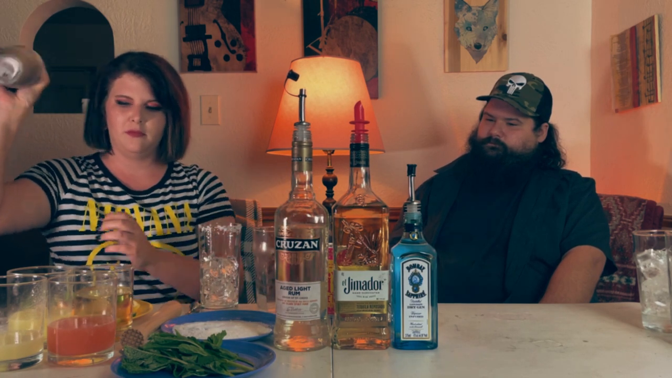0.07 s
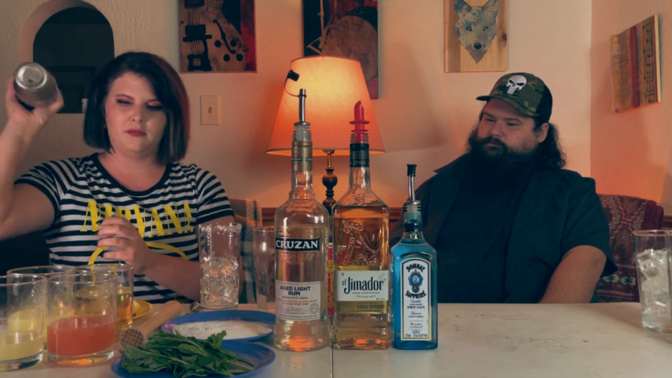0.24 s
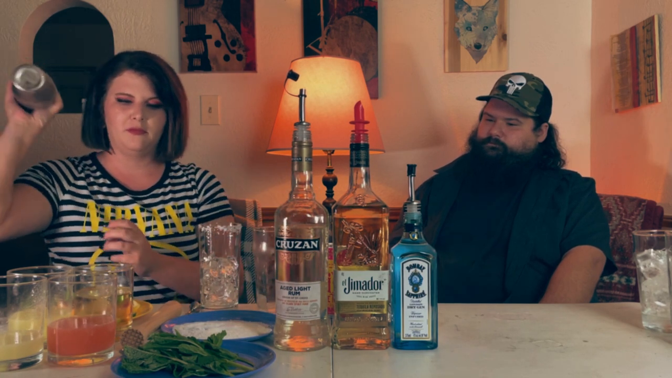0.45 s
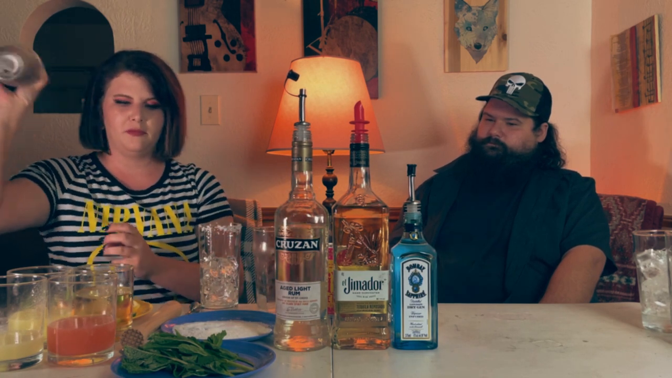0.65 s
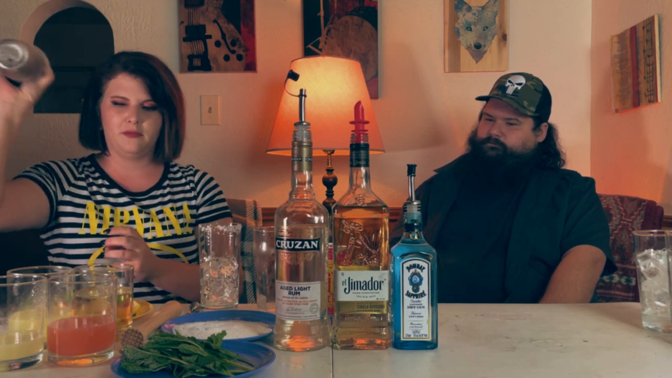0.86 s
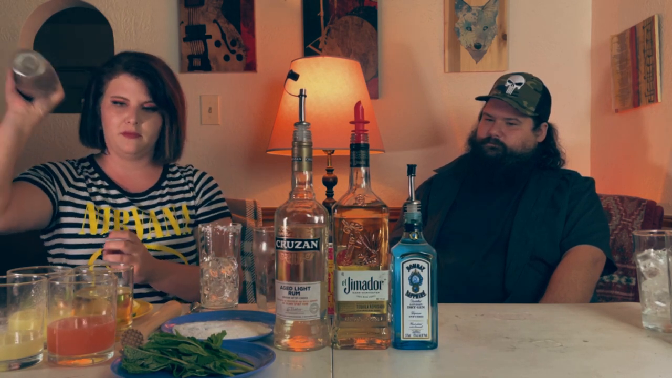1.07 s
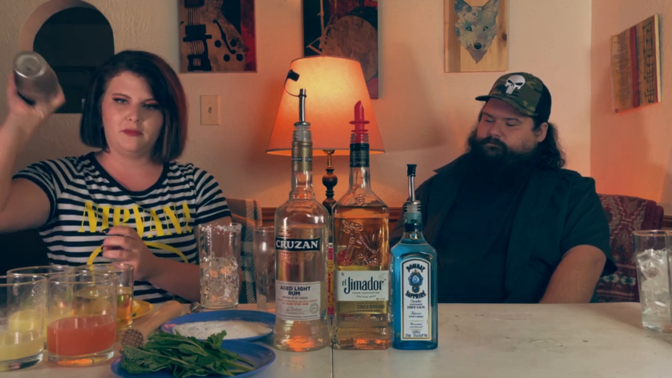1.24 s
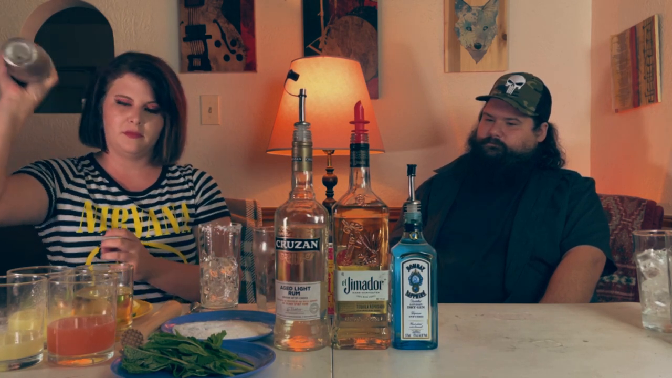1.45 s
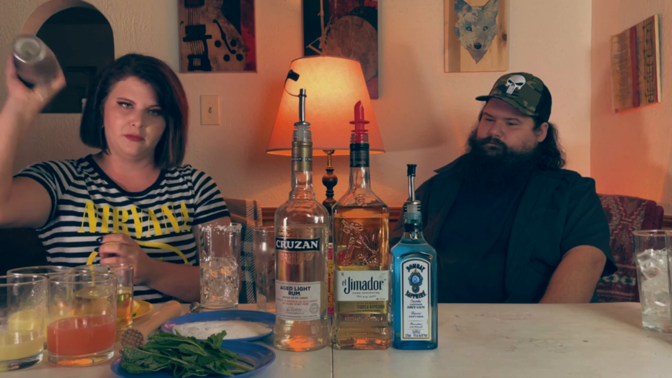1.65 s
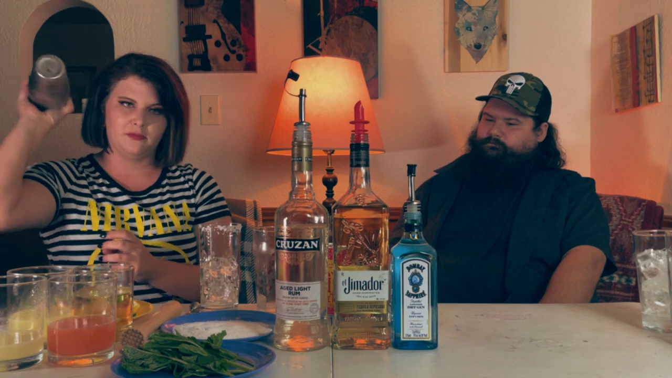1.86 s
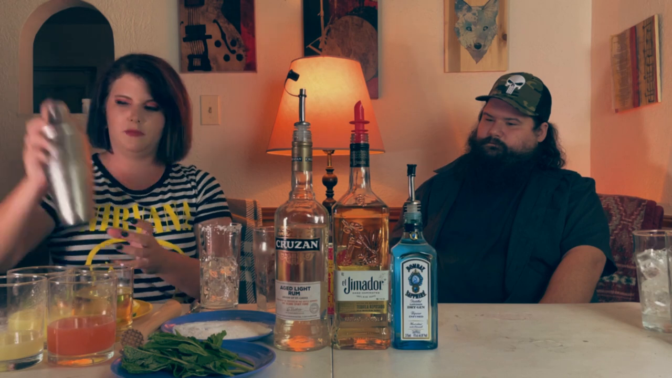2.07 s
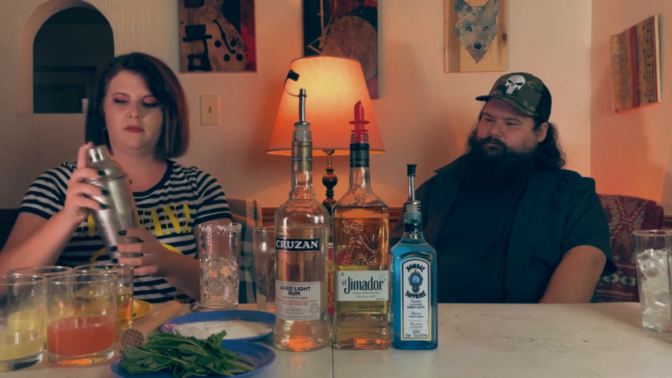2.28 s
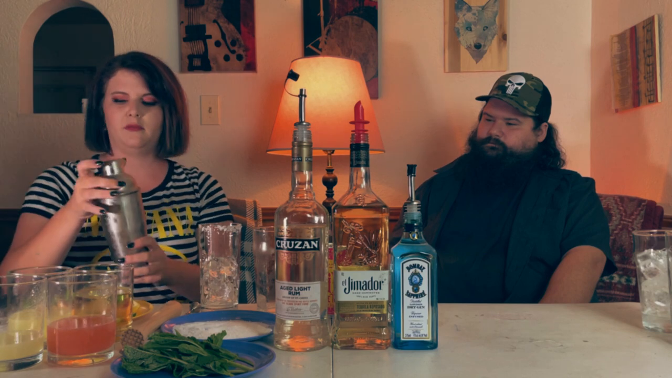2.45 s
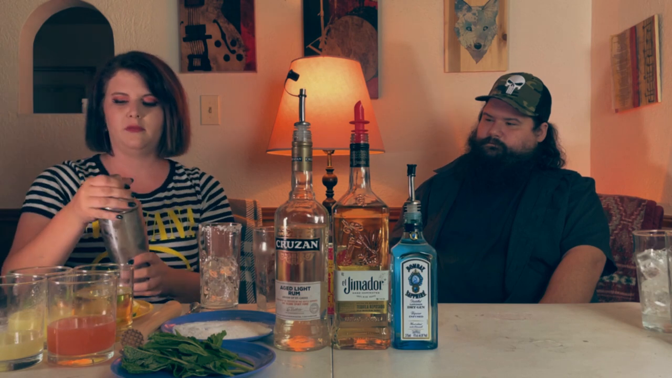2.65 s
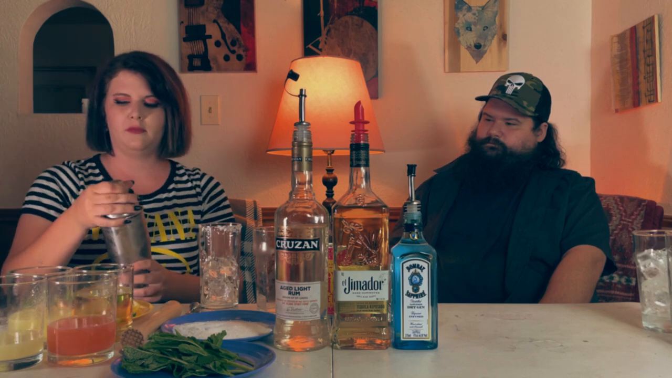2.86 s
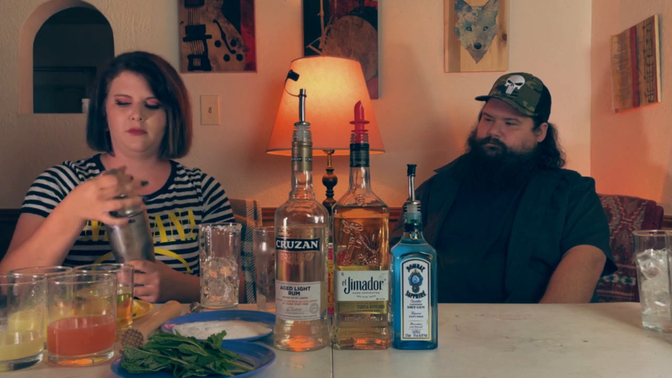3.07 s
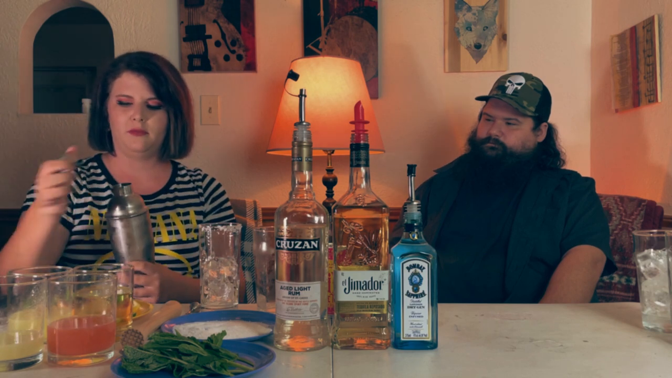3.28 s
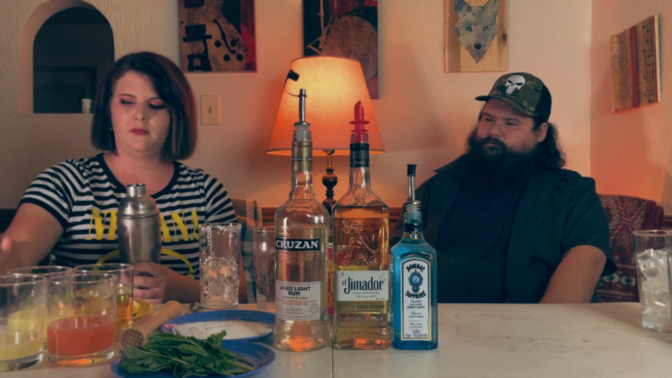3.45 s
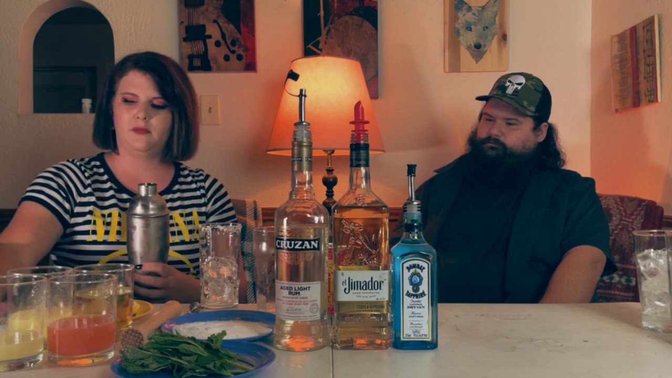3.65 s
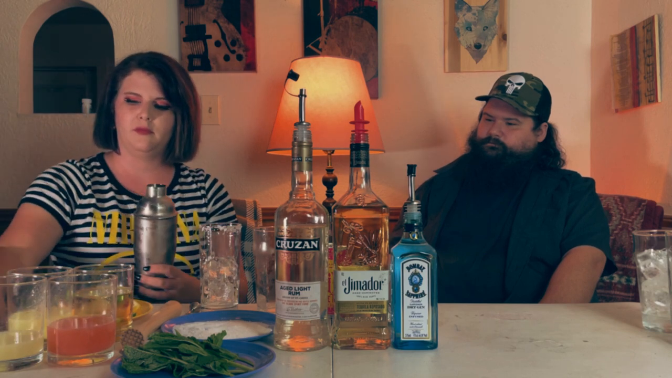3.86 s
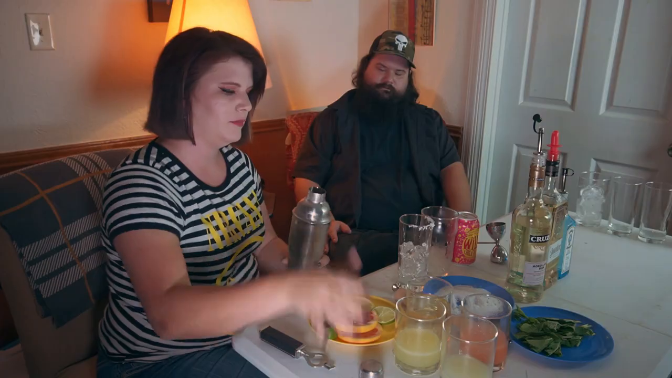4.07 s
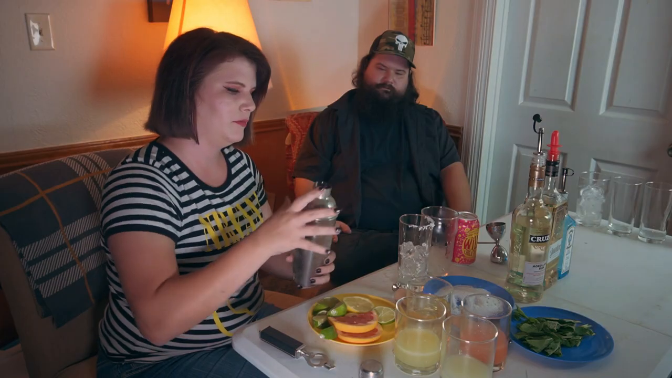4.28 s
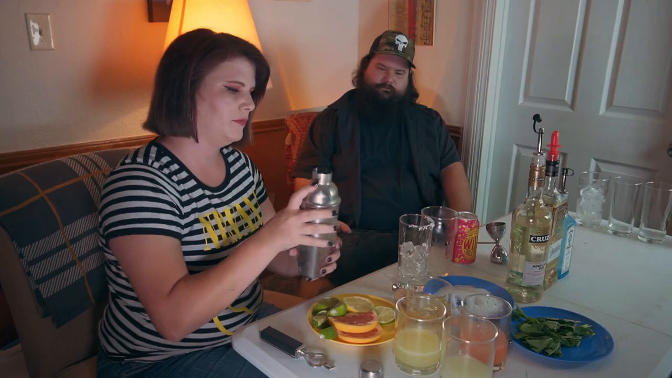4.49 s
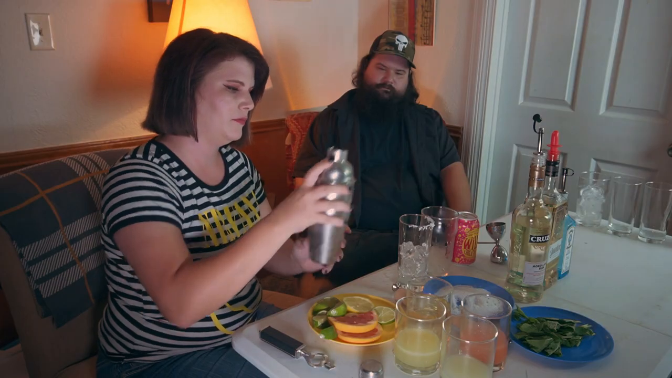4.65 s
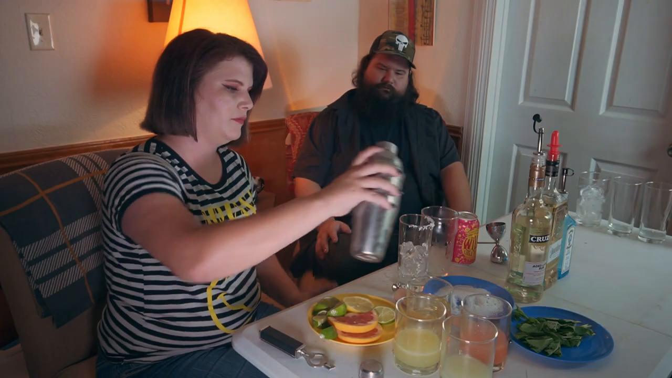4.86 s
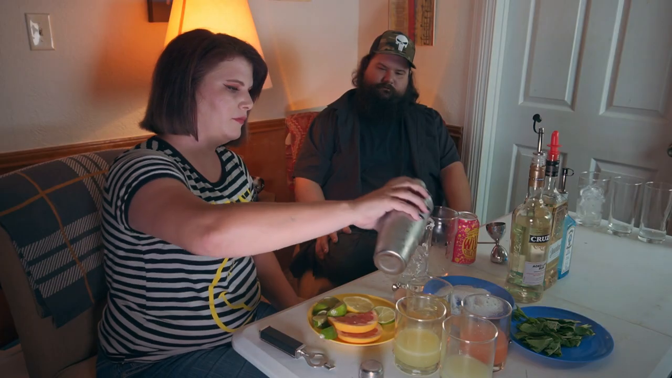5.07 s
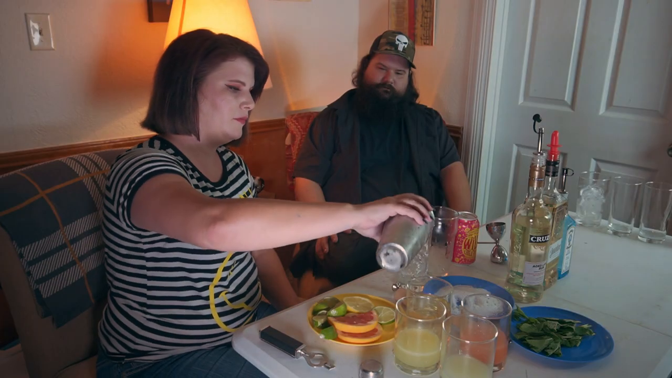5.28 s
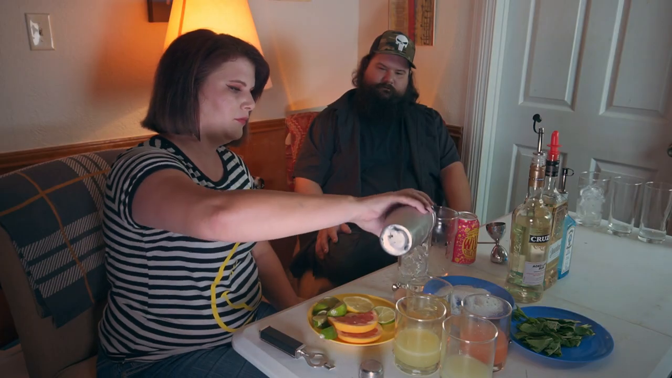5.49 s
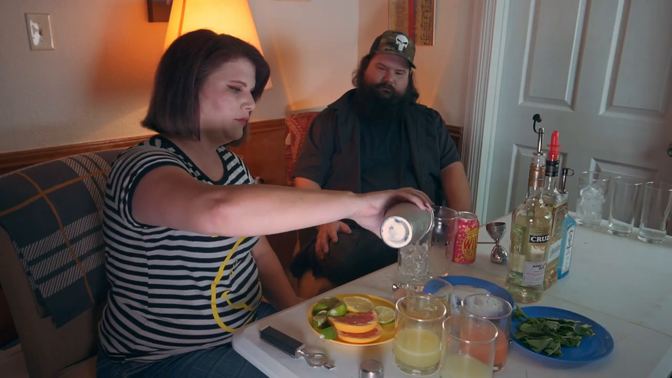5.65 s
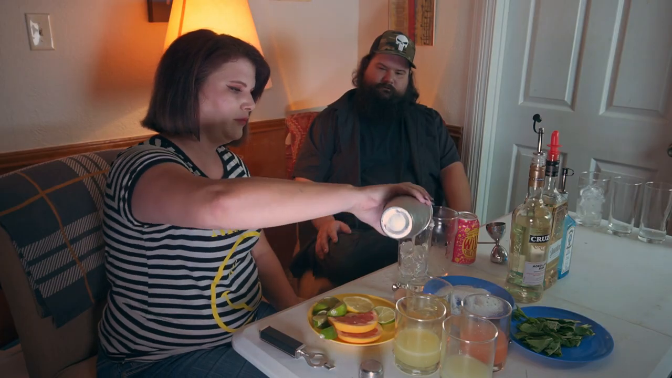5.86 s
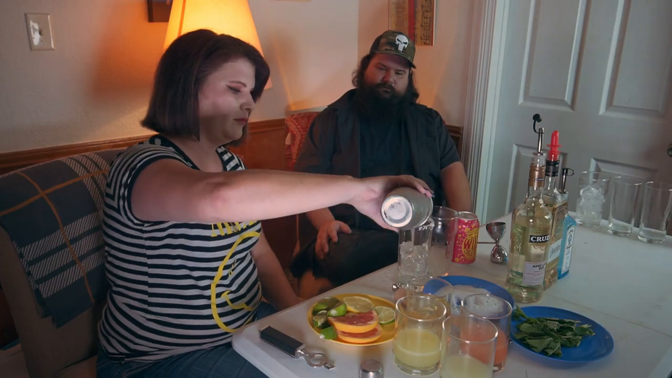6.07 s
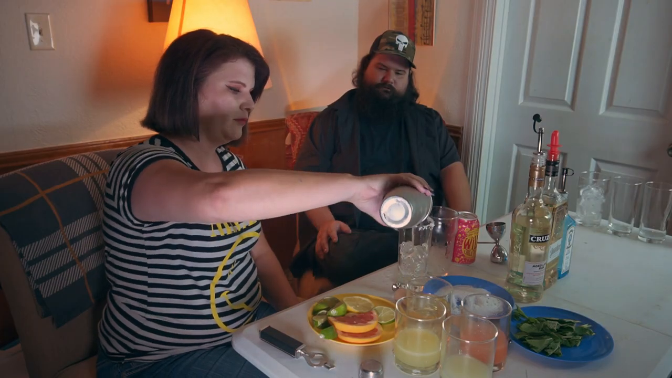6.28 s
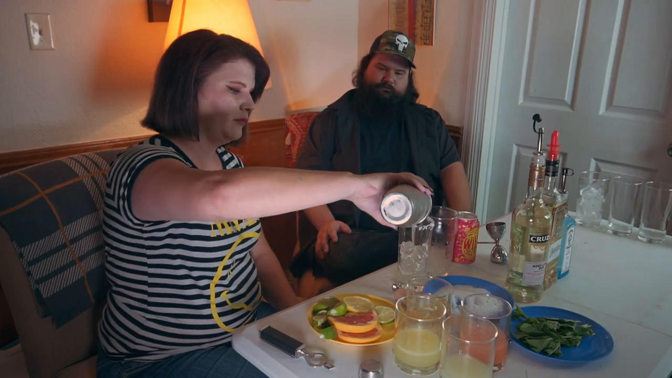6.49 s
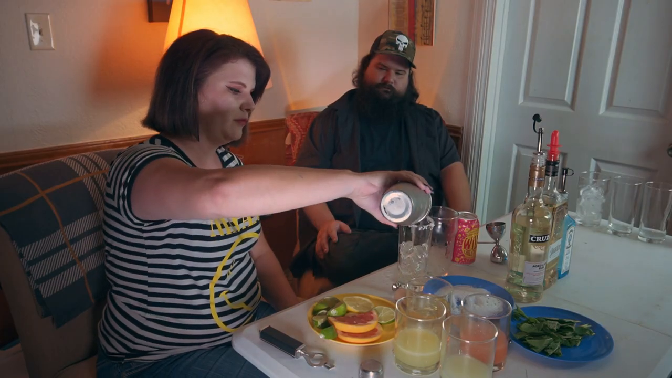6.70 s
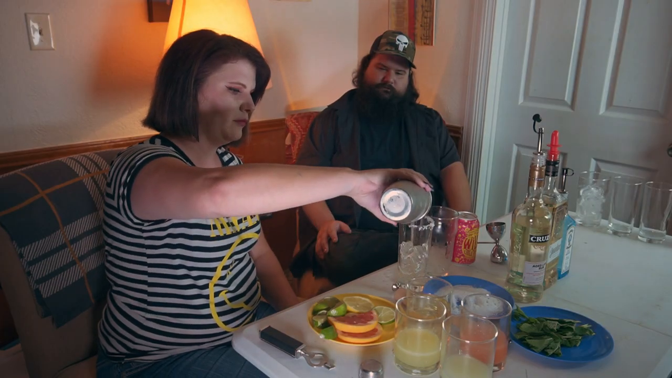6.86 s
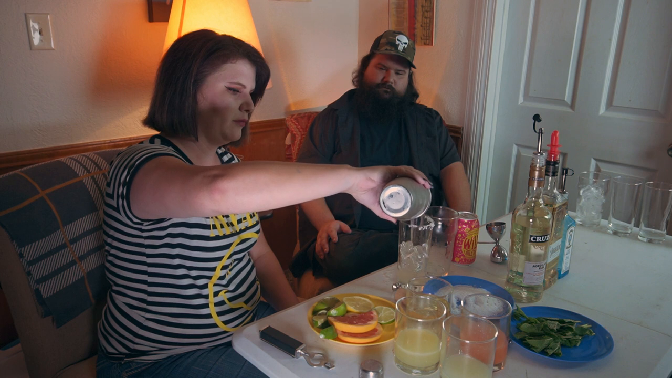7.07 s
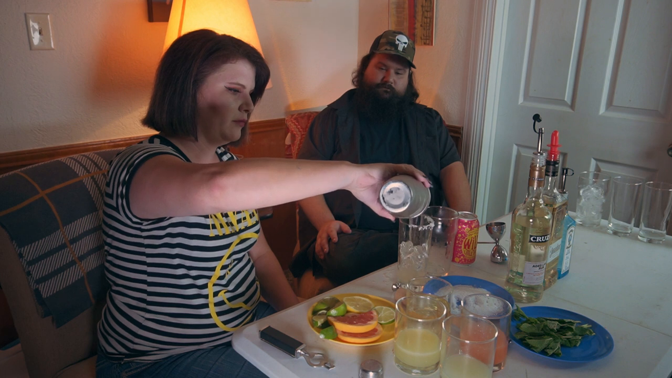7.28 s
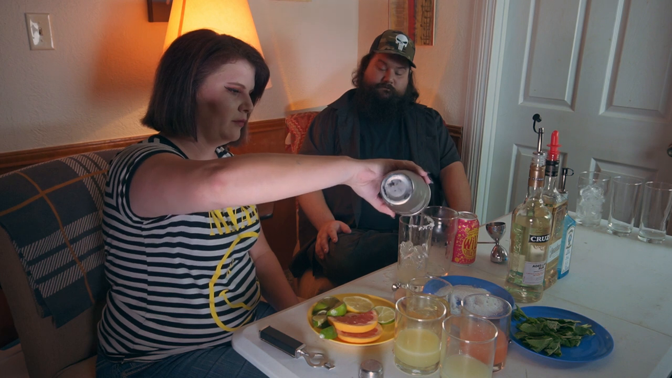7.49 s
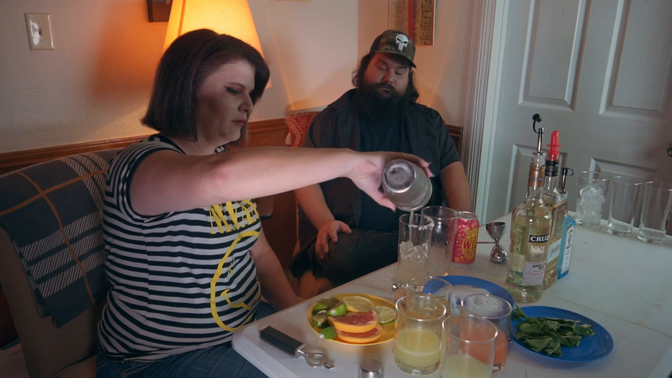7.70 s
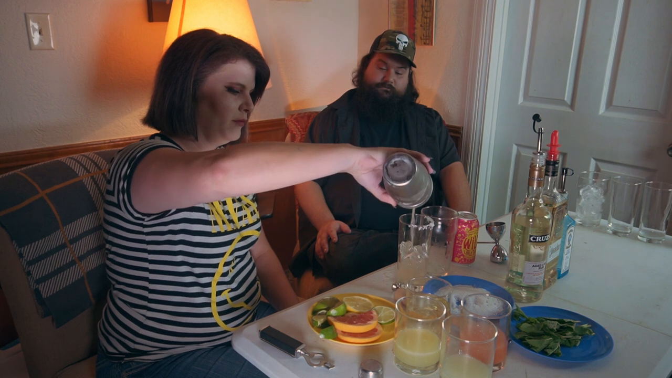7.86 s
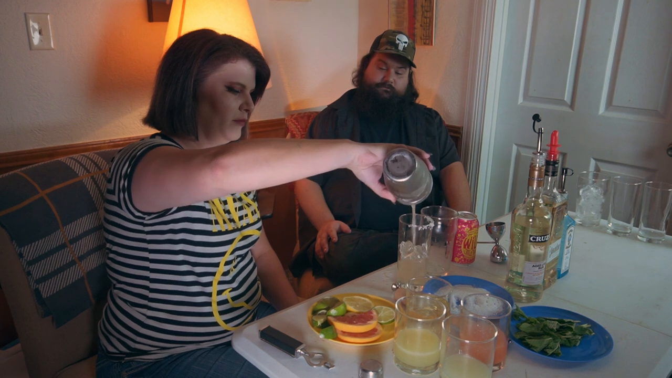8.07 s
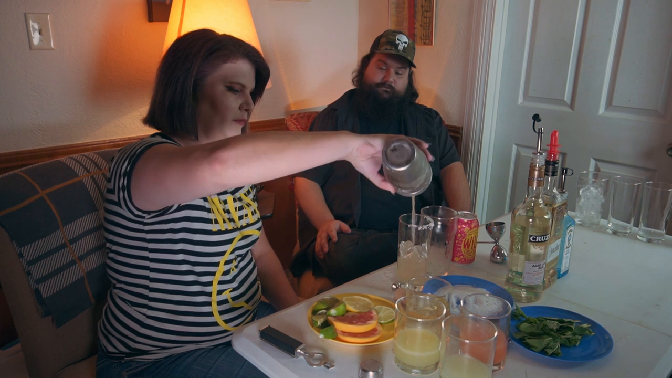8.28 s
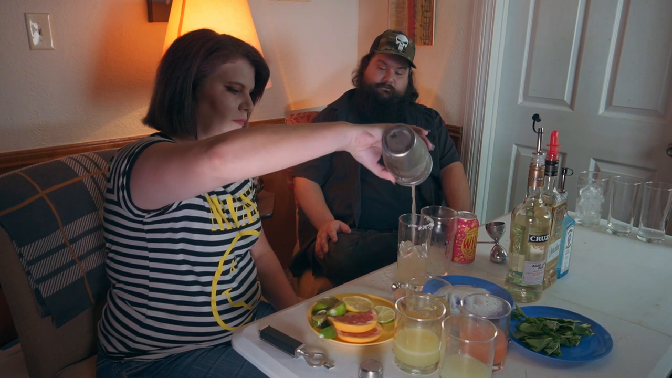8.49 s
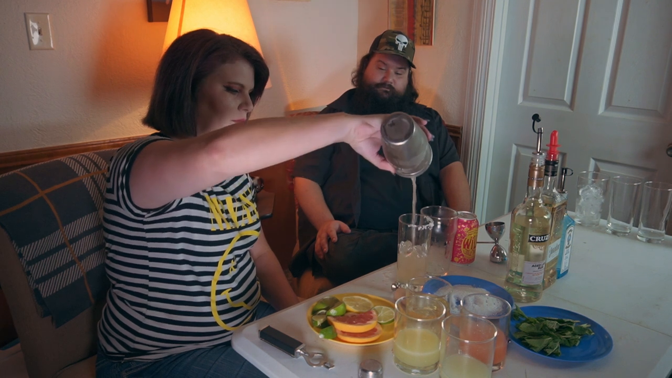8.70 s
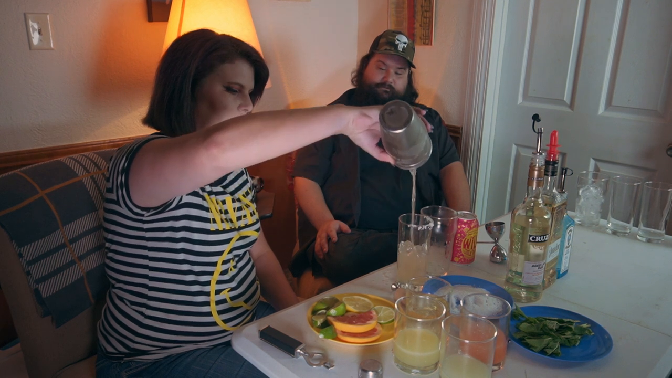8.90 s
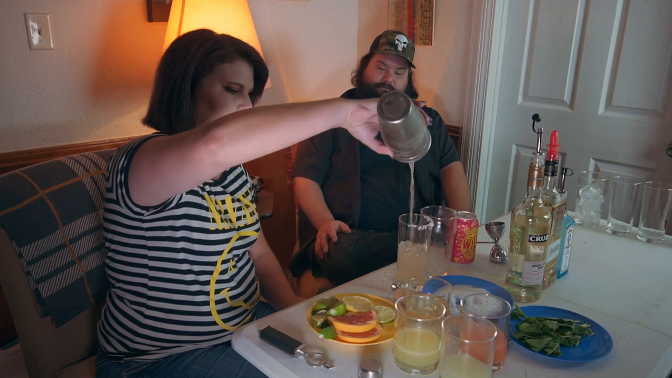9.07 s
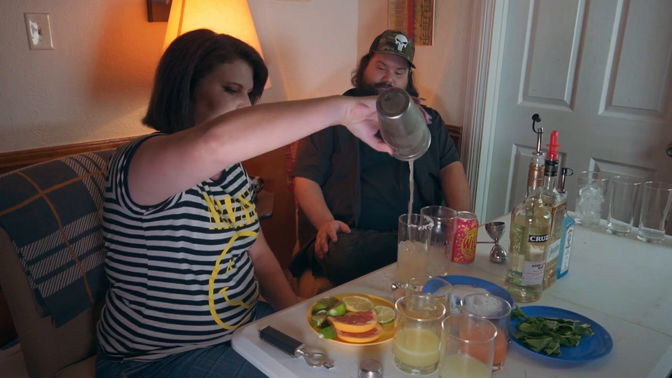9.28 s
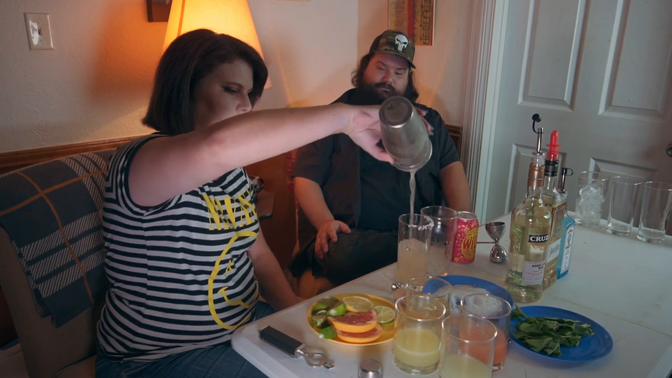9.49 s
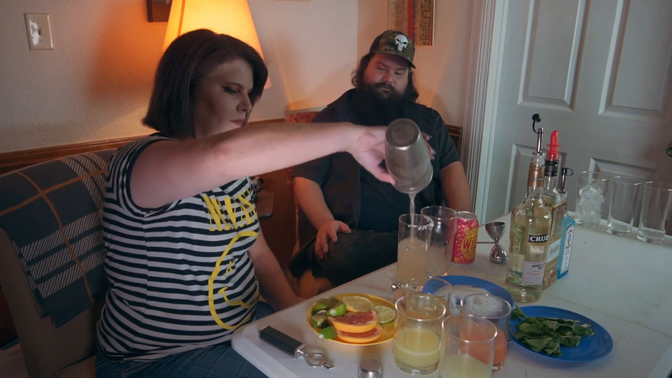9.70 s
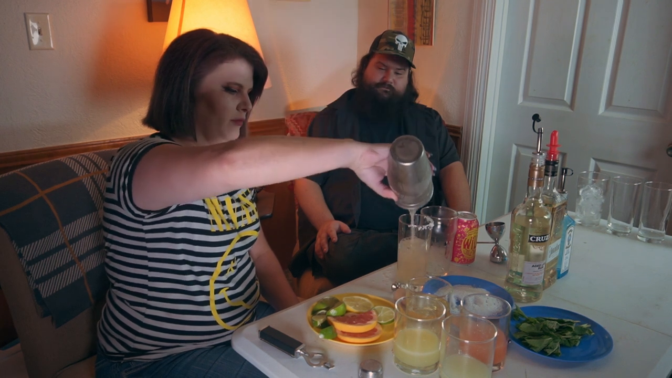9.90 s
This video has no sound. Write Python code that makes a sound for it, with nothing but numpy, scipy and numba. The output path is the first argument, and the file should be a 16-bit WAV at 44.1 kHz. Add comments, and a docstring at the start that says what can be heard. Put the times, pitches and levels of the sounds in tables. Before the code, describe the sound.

Close in a small furnished room, ice cubes slam rapidly back and forth inside a steel shaker, loud enough to overload slightly. The shaking stops after two seconds; hands and cap rub softly on metal, then two quick groups of knocks hit a wooden tabletop. Ice slides and clinks, a thin trickle follows, and finally liquid splashes and gurgles into an iced glass.

```python
"""Ice cubes slam from end to end of a steel cocktail shaker, as noise bursts and pings ringing its shell.
Hands and cap rub the steel, knuckles rap a table twice on its board modes, and loose cubes clink as damped sines.
The shaker is tipped: ice slides, and the drink trickles, then gurgles into a glass of ice as gliding bubbles.
A small furnished room adds echoes and a steady noise floor; a spaced pair of microphones overloads on the
hardest slams."""
import sys
import numpy as np
from scipy import signal
from scipy.fft import rfft, irfft
from scipy.io import wavfile
from scipy.ndimage import uniform_filter1d
from numba import njit

SR = 44100
rng = np.random.default_rng(int(sys.argv[2]) if len(sys.argv) > 2 else 0)


def persist_wave(psi):
    """Save psi, clipped to +-1, as 16-bit WAV."""
    counts = np.round(np.clip(psi, -1, 1) * 32767).astype(np.int16)
    wavfile.write(sys.argv[1], SR, np.atleast_2d(counts).T)


N = 438348
T = np.arange(N) / SR


def undb(db):
    """Level to amplitude: 20 dB is a factor of ten."""
    return 10 ** (np.asarray(db, float) / 20)


def unit(x):
    """Normalization: scale to rms 1."""
    return x / np.sqrt(np.mean(x ** 2))


def high_pass(x, hz):
    """High-pass filter: second-order attenuation below a corner frequency."""
    return signal.sosfilt(signal.butter(2, hz, "high", fs=SR, output="sos"), x)


def ring(x, modes):
    """Modal superposition: two-pole resonances of alternating sign, summed to rms 1."""
    total = 0
    for k, (hz, width, db) in enumerate(modes):
        b, a = signal.iirpeak(hz, hz / width, SR)
        mode = signal.lfilter(b, a, x) * np.sqrt(hz / width)
        total = total + (-1) ** k * undb(db) * mode
    return unit(total)


def level_curve(table):
    """Amplitude envelope: levels joined by straight lines in dB, silent outside the table."""
    s, level_db = np.transpose(table)
    return undb(np.interp(T, s, level_db, -150, -150))


def clicks(rate, spread_db, bed):
    """Shot noise: random tiny impacts of unequal but bounded size over a bed of hiss."""
    hit = rng.random(N) < rate / SR
    size = undb(spread_db * np.minimum(rng.exponential(size=N), 4)) * rng.standard_normal(N)
    return unit(hit * size) + bed * rng.standard_normal(N)


def tails(times, db, t60, rise=0.00012):
    """Exponential decay: each event jumps up and dies away, for half a second at most; powers add."""
    power = np.zeros(N)
    t60, rise = np.broadcast_to(t60, len(times)), np.broadcast_to(rise, len(times))
    for s, gain, decay_s, rise_s in zip(times, undb(db), t60, rise):
        i = int(s * SR)
        t = T[:min(SR // 2, N - i)]
        onset = 1 - np.exp(-t / max(rise_s, 1e-4))
        power[i:i + len(t)] += (gain * 1000 ** (-t / max(decay_s, .01)) * onset) ** 2
    return np.sqrt(power)


def swell(times, db, rise, fall):
    """Exponential growth and decay: up 60 dB over rise s to each moment, down 60 dB over fall s; powers add."""
    late = T - np.reshape(times, (-1, 1))
    slope = np.where(late < 0, -late / max(rise, .01), late / max(fall, .01))
    level_db = np.reshape(db, (-1, 1)) - 60 * slope
    return np.sqrt(np.sum(undb(level_db) ** 2, axis=0))


@njit
def pings(start, hz, t60, size, glide):
    """Damped free vibration: decaying sines whose pitch may glide."""
    out = np.zeros(N)
    for k in range(len(start)):
        z, decay, w = size[k] + 0j, 1000 ** (-1 / (t60[k] * SR)), 2 * np.pi * hz[k] / SR
        for i in range(start[k], min(N, start[k] + int(t60[k] * SR))):
            z *= decay * np.exp(1j * w)
            w *= 1 + glide / (t60[k] * SR)
            out[i] += z.imag
    return out


def cubes(s, db, hz, t60, spread, linger, count):
    """Repeated impact: a cube rings at its own pitch, then bounces at scattered pitches and fading strength."""
    wait = linger * rng.exponential(size=(len(s), count))
    detune = np.exp(spread * rng.standard_normal((len(s), count)))
    wait[:, 0], detune[:, 0] = 0, 1
    size = undb(db[:, None] - 1.0 * (wait > 0) - 8 * wait / linger)
    start = np.minimum((s[:, None] + wait) * SR, N - 1).astype(np.int64)
    f = np.minimum(hz[:, None] * detune, SR / 3)
    return pings(start.ravel(), f.ravel(), np.full(f.size, t60), size.ravel(), -0.024)


def bubbles(rate, hz, spread, cycles, spread_db, glide):
    """Bubble resonance: bubbles or droplets scattered round a pitch, each gliding up as it dies."""
    moment, scatter, strength = rng.random((3, int(rate * N / SR)))
    start = (moment * N).astype(np.int64)
    f = np.broadcast_to(hz, N)[start] * np.exp(spread * (2 * scatter - 1))
    size = undb(-spread_db * np.log(strength + .015))
    return unit(pings(start, f, cycles / f, size, glide))  # each lasts a set number of cycles


# spectrum of the room's noise floor: (frequency [Hz], relative density [dB per Hz])
ROOM_SPECTRUM = [(25, -20), (86, -8), (148, -14.5), (209, -9.5), (253, -12), (410, -21.5), (666, -25.5),
                 (15500, -48.5)]
ROOM_DB = -46.5


def room_tone():
    """Partial coherence: steady shaped noise, low rumble to hiss, mostly unrelated at the two microphones."""
    hz, db = np.transpose(ROOM_SPECTRUM)
    gain = undb(np.interp(np.log(np.fft.rfftfreq(N, 1 / SR) + 1), np.log(hz), db))
    noise = rng.standard_normal((2, N)) + 0.54 * rng.standard_normal(N)  # own part + shared part
    return undb(ROOM_DB) * unit(irfft(rfft(noise) * gain, N))


# cubes hitting steel: (time [s], relative rattle level [dB], ring level [dB], ring pitch [Hz])
SLAMS = [(0.0, -15, -9.5, 2145), (0.04, -3.5, -14, 2265), (0.062, -9, -10.5, 2310), (0.135, -18, -27, 2080),
         (0.224, -6, -12, 2880), (0.315, -4, -14, 2840), (0.348, -5, -8.5, 2370), (0.414, 0, -3.5, 2110),
         (0.453, -2, -2.5, 2106), (0.48, -4, -6.5, 3070), (0.586, -6.5, -18, 2400), (0.605, -5, -6, 2064),
         (0.714, -2.5, 0, 2030), (0.739, 3.5, -0.5, 1970), (0.782, -20.5, -0.5, 2130), (0.86, 5, -15, 2090),
         (0.984, 2.5, 1.5, 1760), (1.044, -6, -10, 2430), (1.139, -2.5, -19.5, 1980),
         (1.166, -5, -7.5, 2060), (1.233, -9, -19, 2380), (1.271, -1.5, -4, 2010), (1.312, -2, -10.5, 2090),
         (1.403, -1.5, -14, 2730), (1.528, -2.5, -5, 1870), (1.694, -1.5, -6, 2040),
         (1.808, 3.5, 2.5, 2062), (1.944, -1.5, -19, 2086), (1.969, -8, -5.5, 2320),
         (2.084, -17, -2.5, 1805), (2.105, 1.5, -9.5, 1890), (2.132, 2, -3, 1850), (2.199, -8.5, -16, 2790),
         (2.296, -17.5, -22, 2800), (2.335, -27, -23, 663), (2.435, -18.5, -34, 2810),
         (2.489, -20.5, -25.5, 2960)]
# heavy cubes landing on the base: (time [s], relative level [dB])
THUMPS = [(0.058, -31.5), (0.318, -26), (0.61, -32), (0.986, -28), (1.165, -18), (1.427, -28.5),
          (1.694, -30)]
# resonances of the steel shell: (frequency [Hz], width [Hz], relative level [dB])
SHELL = [(1114, 610, -4.5), (1606, 1120, 0.5), (1898, 99, -5.5), (2123, 430, -11.5), (2380, 61, -9.5),
         (2696, 620, -6.5), (3950, 2520, -2.5), (4740, 780, -6)]
# bands of the crackle of ice and spray: (frequency [Hz], width [Hz], relative level [dB])
TREBLE = [(8200, 4850, -1), (10560, 5200, 0), (13100, 5500, -8)]
SWING_S, FIRST_SWING_S, BACK_SHARE = .2745, .015, .4  # one full swing; share of it spent going back
BACK_T60_S, FORWARD_T60_S = 0.25, 0.15
BACK_RISE_S, FORWARD_RISE_S = 0.0069, 0.00039  # time constants
SHAKE_ENDS_S, SLUSH_DB, SETTLE_T60_S = 2.22, -25.5, 0.63


def shaker():
    """Forced vibration: slams and slush excite the steel shell, a bright crackle and a dull thud."""
    s, db, ring_db, hz = np.transpose(SLAMS)
    # the back stroke showers loose chips, the forward stroke lands the cubes cleanly
    back = (s - FIRST_SWING_S) / SWING_S % 1 < BACK_SHARE
    t60 = np.where(back, BACK_T60_S, FORWARD_T60_S)
    rise = np.where(back, BACK_RISE_S, FORWARD_RISE_S)
    slush = undb(SLUSH_DB) * 1000 ** (-np.maximum(T - SHAKE_ENDS_S, 0) / SETTLE_T60_S)
    # a long rattle is a shower of chips: brighter than one clean cube
    shower_db = 5.1 * np.log2(t60 / 0.13)
    body = tails(s, db - 12.5, t60, rise) + slush
    crack = tails(s, db - 20 + shower_db, 0.84 * t60, rise) + undb(-8.5) * slush
    thud = tails(*np.transpose(THUMPS), 0.04) * undb(11) + undb(-9.0) * slush
    rattle = clicks(1500, 2.93, 0.74)
    crackle = rattle + 1.05 * clicks(2500, 1.4, 0.26)
    thud_noise = rattle + 0.28 * rng.standard_normal(N)
    out = body * ring(rattle, SHELL) + crack * ring(crackle, TREBLE)
    out += thud * ring(thud_noise, [(320, 207, -4.5), (640, 580, 3.5), (930, 830, 4.0)])
    out += cubes(s, ring_db, hz, 0.039, .06, 0.008, count=3)
    return high_pass(out, 220)  # the shaker's sound carries little below 220 Hz


# extra rings of the held shaker: (frequency [Hz], width [Hz], relative level [dB])
GRIPPED = [(640, 610, -3), (1345, 90, -6.5), (2200, 78, -7), (2910, 160, -8)]
HANDS_S, HANDS_DB, HANDS_RISE_S, HANDS_FALL_S = 2.99, -49, 31, 4.8
# the cap's swell, before it is averaged over CAP_SMOOTH_S
CAP_S, CAP_DB, CAP_RISE_S, CAP_FALL_S, CAP_SMOOTH_S = 3.108, -32.5, .2, .22, .04


def cap():
    """Friction excitation: hands and cap rub the wet steel once the shaking ends."""
    rub = clicks(2000, 3., 0.5)
    hands = swell(HANDS_S, HANDS_DB, HANDS_RISE_S, HANDS_FALL_S)
    pull = uniform_filter1d(swell(CAP_S, CAP_DB, CAP_RISE_S, CAP_FALL_S), int(CAP_SMOOTH_S * SR))
    steel = ring(rub, SHELL + GRIPPED) + undb(-9.0) * ring(rub, TREBLE)
    return (T > SHAKE_ENDS_S) * (hands + pull) * steel


# cubes shifting in shaker and glass: (time [s], relative level [dB], main pitch [Hz])
CLINKS = [(2.687, -38.5, 2540), (2.814, -36.5, 2820), (3.478, -35, 1310), (4.245, -41.5, 3020),
          (4.659, -33, 2230), (4.732, -31, 2320), (4.836, -29.5, 3220), (4.866, -20.5, 1414),
          (5.01, -35, 1320), (5.149, -30.5, 900), (5.239, -24.5, 1816), (5.327, -28, 1225),
          (5.374, -27, 860), (5.431, -21.5, 3260), (5.491, -16, 2940), (5.528, -27, 1860),
          (5.63, -24.5, 910), (5.735, -22.5, 2720), (5.874, -30, 3390), (6.099, -30, 4970),
          (6.194, -32, 2550), (6.399, -37, 846), (6.428, -40, 4640), (6.565, -39.5, 3200),
          (6.67, -40, 1440), (6.824, -40, 3990), (7.052, -42, 5420), (7.099, -40, 4200),
          (7.264, -36.5, 3200), (7.356, -38.5, 3200), (7.378, -53, 1640), (7.491, -38, 3300),
          (7.7, -40.5, 3960), (7.848, -32.5, 4960), (7.985, -33, 1910), (8.106, -30, 2770),
          (8.187, -28.5, 836), (8.273, -25.5, 3350), (8.407, -23.5, 2370), (8.464, -26.5, 3880),
          (8.85, -27.5, 2770), (8.96, -21, 2640), (9.02, -25, 3870), (9.195, -24.5, 3010),
          (9.265, -22.5, 1240), (9.48, -23, 3590), (9.606, -22.5, 4370), (9.817, -29.5, 1190)]
# sharp ticks of droplets and cracking ice: (time [s], relative level [dB])
TICKS = [(2.6898, -30), (2.8548, -27.5), (6.542, -26.5), (8.0506, -25), (8.698, -23), (8.913, -17),
         (9.2956, -12), (9.445, -23), (9.744, -17.5)]
CLINK_T60_S, CLINK_SPREAD = 0.048, 0.0997  # spread of pitch, as a natural logarithm


def clinks():
    """Impact excitation: loose cubes ring, tick and leave a short rattle in the shell."""
    s, db, hz = np.transpose(CLINKS)
    rattle = clicks(2500, 0.99, 0.42)
    body = tails(s, db - 14, 0.43) + tails(s, db - 8.5, 0.024)
    out = body * ring(rattle, SHELL) + tails(s, db - 17.5, 0.064) * ring(rattle, TREBLE)
    out += undb(-1.0) * tails(*np.transpose(TICKS), 0.01) * ring(rng.standard_normal(N), TREBLE)
    return out + cubes(s, db - 3.0, hz, CLINK_T60_S, CLINK_SPREAD, .018, count=5)


# narrow notes that linger in steel, glass and trapped air:
# (start [s], length [s], relative level [dB], pitch [Hz], drift [Hz/s])
NOTES = [(2.853, 0.12, -53, 2060, 600), (3.22, .28, -62.5, 6380, -100), (4.658, 0.39, -52.5, 2270, 0),
         (4.867, 0.62, -47, 1312, -420), (5.373, 0.46, -45.5, 870, 0), (5.93, 0.27, -48.5, 943, 50),
         (6.961, .12, -50, 1460, 98), (7.2, 0.46, -53, 1562, 33.5), (7.515, 0.21, -50.5, 3370, -480),
         (8.412, 0.62, -44.5, 2603, 40.5)]
NOTE_T60_S, NOTE_WAVER, NOTE_EDGE_S = .035, .015, .012  # waver: relative pitch deviation


def notes():
    """Amplitude modulation: smoothed random taps keep each narrow, wavering note ringing."""
    keep = 1000 ** (-1 / (NOTE_T60_S * SR))
    ringing = unit(signal.lfilter([1], [1, -keep], clicks(110, 2.5, .45)))
    # a new random pitch deviation every 600 samples
    waver = 1 + NOTE_WAVER * np.repeat(rng.standard_normal(N // 600 + 1), 600)[:N]
    out = 0
    for s, length, db, hz, drift in NOTES:
        gate = np.clip(np.minimum(T - s, s + length - T) / NOTE_EDGE_S + .5, 0, 1)
        pitch = (hz + drift * np.clip(T - s, 0, length)) * waver
        tone = np.sin(2 * np.pi * np.cumsum(pitch) / SR) * np.sqrt(2)
        out = out + undb(db) * gate * ringing * tone
    return out


# raps on the table: (time [s], relative level [dB], brightness relative to the rap [dB], chatter T60 [s])
RAPS = [(3.791, -33, -12, 0.51), (3.876, -6, -13.5, 0.22), (3.897, -5, -9.5, 0.2),
        (3.929, -13.5, -27, 0.13), (4.044, -11, -18.5, 0.18), (4.07, -5, -9.5, 0.18)]
# modes of the table board: (frequency [Hz], width [Hz], relative level [dB])
BOARD = [(99, 4.4, -10.5), (122.3, 3.5, -9.5), (348, 97, -3), (463, 31, -4.5), (490, 110, -7),
         (623, 60, -8), (686, 52, -10), (920, 180, -10.5), (1370, 680, -11)]
KNUCKLE_T60_S = .01


def table():
    """Impulse response: each rap chatters into the board's modes; things standing on it tick along."""
    s, db, bright_db, t60 = np.transpose(RAPS)
    chatter = clicks(1600, 1.3, 0.66)
    blow = tails(s, db - 18, t60) * high_pass(chatter, 200) + tails(s, db - 19.5, KNUCKLE_T60_S)
    response = ring(T[:SR // 2] < .0003, BOARD)  # struck by a 0.3 ms pulse
    board = signal.fftconvolve(blow, response)[:N] * undb(-34.0)
    ticking = ring(chatter, [(2840, 450, 19), (5100, 4700, 2.0), (7960, 4000, -29)])
    return board + tails(s, db + bright_db - 10.5, t60) * ticking


# ice sliding down the tipped shaker: (time [s], relative level [dB])
SLIDE = [(4.62, -63), (4.8, -51), (5.4, -56), (5.55, -32.5), (5.8, -47), (6.1, -88)]
# stream from the spout, a trickle at first: (time [s], relative level [dB])
FLOW = [(5.7, -56), (6.9, -55), (7.6, -58.5), (7.75, -51), (8.1, -49.5), (8.38, -44.5), (8.65, -45.5),
        (9.0, -41), (9.94, -43.5)]
# surges of the stream: (time [s], relative splash level [dB], gurgle level [dB])
SURGES = [(8.21, -34.5, -35), (8.52, -54, -32), (8.78, -42.5, -32), (9.14, -51, -33.5), (9.27, -42, -29.5),
          (9.69, -57, -29.5), (9.92, -56, -29)]
# deep glugs from inside the shaker: (time [s], level [dB])
GLUGS = [(8.47, -42.5), (8.76, -33), (8.85, -33), (9.0, -36), (9.3, -40), (9.6, -49)]
SLIDE_FIZZ_DB, SPLASH_DB, DRIP_DB = -11, -6, -6  # relative to slide, flow and flow
SURGE_RISE_S, SURGE_FALL_S = 0.45, 0.94
GURGLE_HZ, FILL_HZ_PER_S = 891, 134  # pitch at the first surge; rise as the glass fills
GLUG_RISE_S, GLUG_FALL_S = 0.55, 0.39


def pour():
    """Entrained air: the stream splashes on ice, fizzes in patches, gurgles at its trapped air's pitch, glugs."""
    slide, flow = level_curve(SLIDE), level_curve(FLOW)
    s, splash_db, gurgle_db = np.transpose(SURGES)
    surge = swell(s, splash_db, SURGE_RISE_S, SURGE_FALL_S)
    gurgle = swell(s, gurgle_db, SURGE_RISE_S, SURGE_FALL_S)
    glug = swell(*np.transpose(GLUGS), GLUG_RISE_S, GLUG_FALL_S)
    gurgle_hz = np.maximum(GURGLE_HZ + FILL_HZ_PER_S * (T - s[0]), GURGLE_HZ / 2)
    # random level, redrawn every 30 ms
    patch = undb(4.5 * np.interp(T, np.arange(0, 10, .03), rng.standard_normal(334)))
    # droplet pitch rises and falls with the patches
    droplets = bubbles(500, 3200. * patch ** 0.423, 0.33, 26.7, 3.3, 0.21)
    splash = 0.46 * ring(clicks(2500, 1.8, 1.0), SHELL[4:]) + droplets
    fizz = .5 * ring(rng.standard_normal(N), TREBLE) + bubbles(260, 9000., .4, 24., 4., .12)
    # the splash level follows the same patches shifted by a second
    out = (slide + undb(SPLASH_DB) * flow + surge) * np.roll(patch, SR) * splash
    out += (undb(SLIDE_FIZZ_DB) * slide + flow) * patch * fizz
    out += undb(DRIP_DB) * flow * bubbles(45, 2800., .7, 45., 3., .2)
    out += gurgle * bubbles(150, gurgle_hz, 0.11, 30.0, 2.1, 0.11)
    return out + glug * bubbles(160, 453.0, 0.32, 21.0, 1.3, 0.05)


def echoes(dry, t60, count=4):
    """Diffuse reverberation: reflections differ at each microphone and change as shaker and hands move."""
    t = T[:int(.3 * SR)]
    # crossfade round a cycle of random echoes, one every 90 ms
    place = 1 - np.abs((T / .09 + np.arange(count)[:, None]) % count - 1)
    out = 0
    for share in np.clip(place, 0, 1):
        echo = rng.standard_normal((2, len(t))) * 1000 ** (-t / t60) * (t > .001)
        echo /= np.sqrt(np.sum(echo ** 2, axis=1, keepdims=True))
        out = out + signal.fftconvolve((np.sqrt(share) * dry)[None], echo, axes=1)[:, :N]
    return out


CROSSOVER_HZ, ECHO_T60_S, TREBLE_T60_S, ECHO_DB = 4150, 0.23, 0.041, -1


def scene():
    """Superposition: direct sound, shared by the microphones, plus reflections and room tone."""
    direct = shaker() + cap() + clinks() + notes() + table() + pour()
    dull = signal.sosfilt(signal.butter(1, CROSSOVER_HZ, fs=SR, output="sos"), direct)
    bright = direct - dull
    # furnishings soak up the treble first
    wet = echoes(dull, ECHO_T60_S) + echoes(bright, TREBLE_T60_S)
    # the right capsule is a little further off: one sample later and softer
    pair = np.array([direct, np.roll(direct, 1)])
    return undb([[-1], [-1.8]]) * (pair + undb(ECHO_DB) * wet) + room_tone()


TOP_HZ = 15700


def record(dry):
    """Overload and band limiting: the input clips near full scale; the top is cut."""
    clipped = np.clip(dry, -.93, .93)
    cut = signal.sosfilt(signal.ellip(10, .2, 75, TOP_HZ, fs=SR, output="sos"), clipped)
    return np.clip(cut, -1, 1)


dry = scene()
out = record(dry)
persist_wave(out)
```